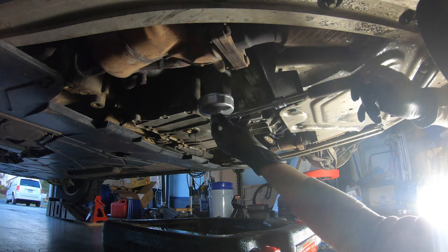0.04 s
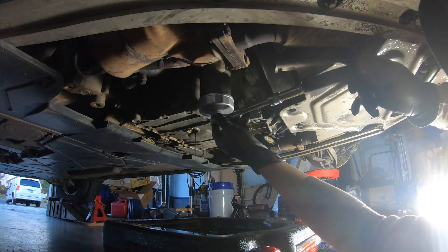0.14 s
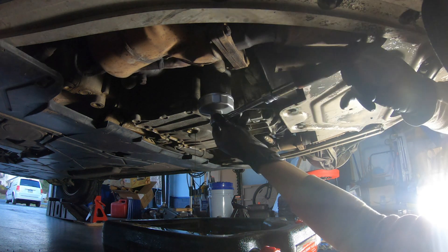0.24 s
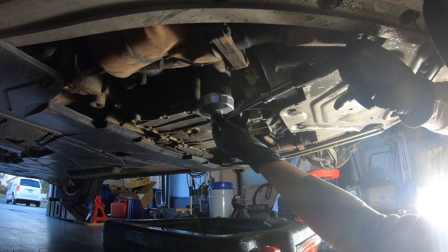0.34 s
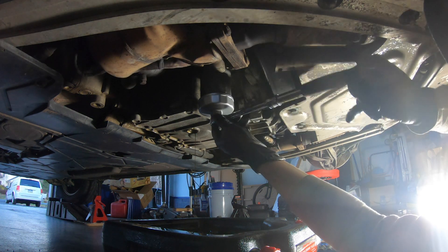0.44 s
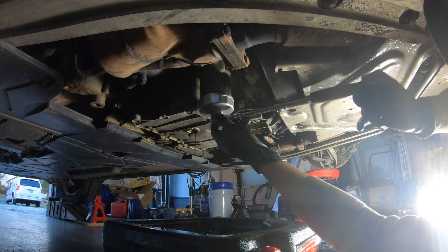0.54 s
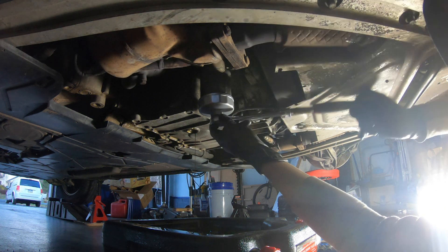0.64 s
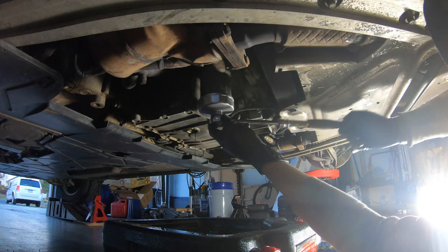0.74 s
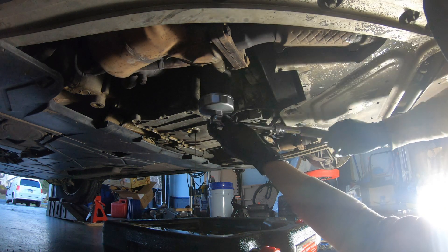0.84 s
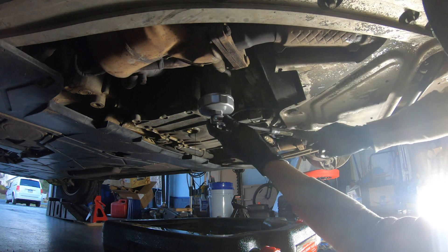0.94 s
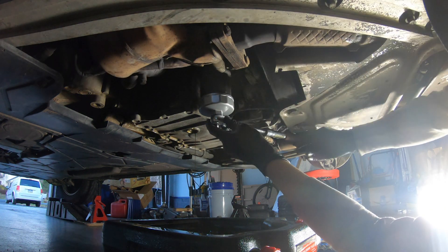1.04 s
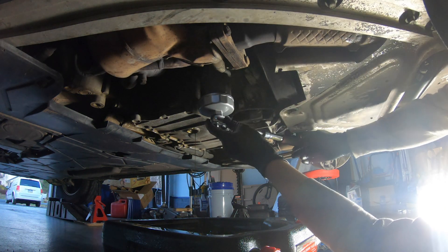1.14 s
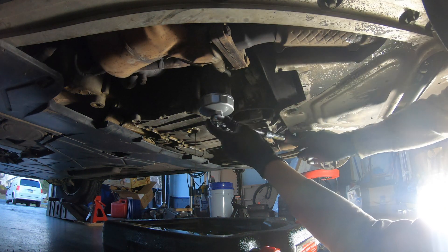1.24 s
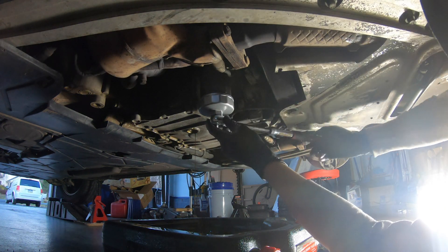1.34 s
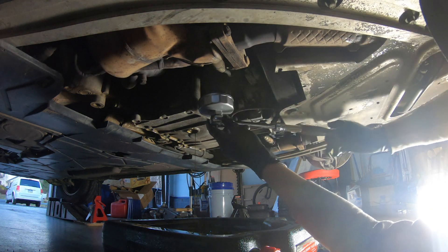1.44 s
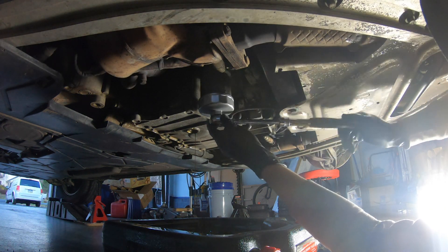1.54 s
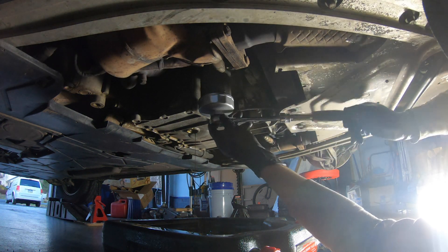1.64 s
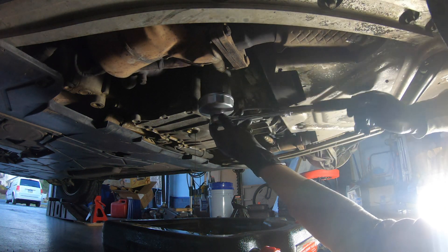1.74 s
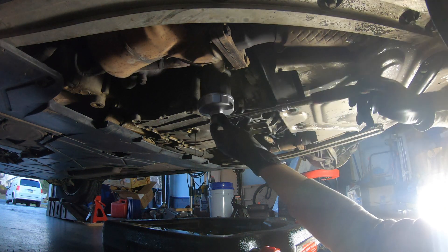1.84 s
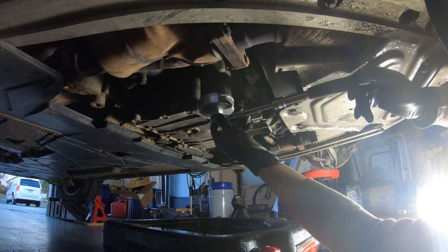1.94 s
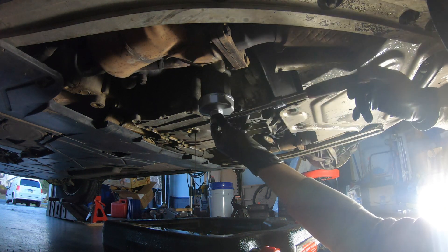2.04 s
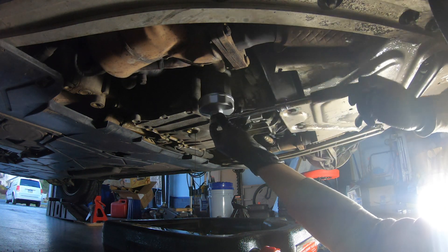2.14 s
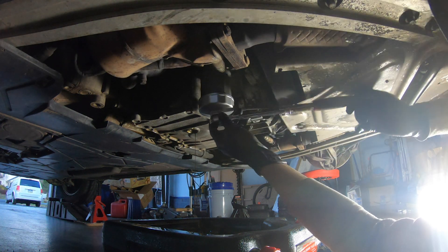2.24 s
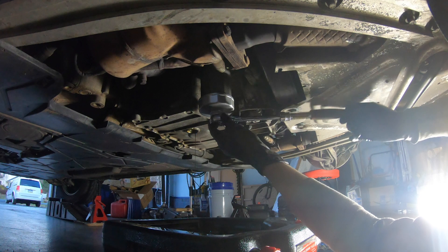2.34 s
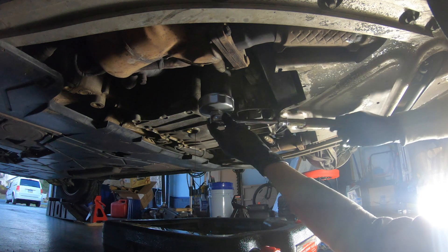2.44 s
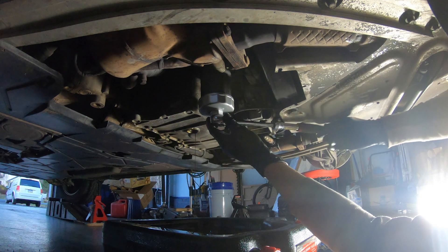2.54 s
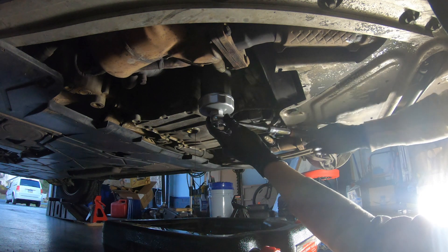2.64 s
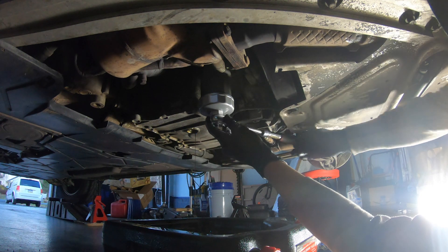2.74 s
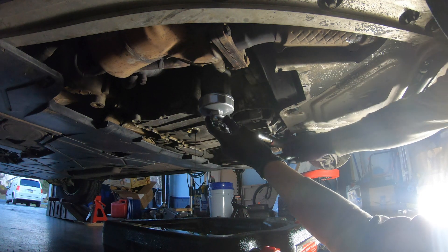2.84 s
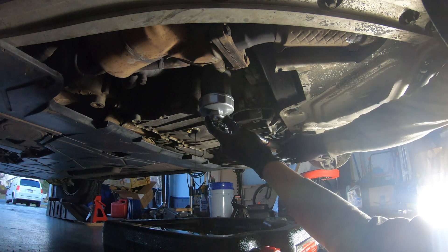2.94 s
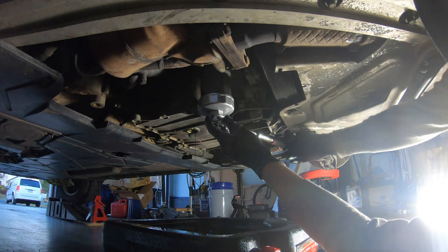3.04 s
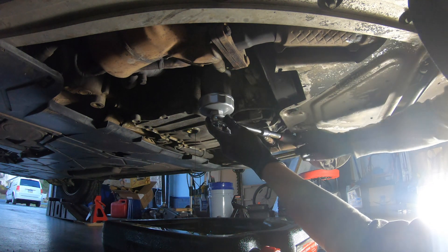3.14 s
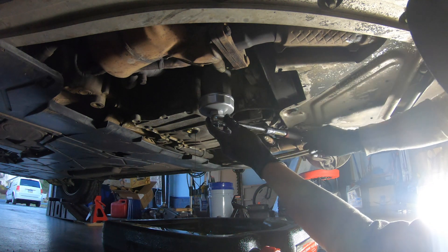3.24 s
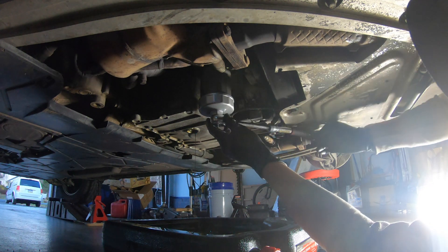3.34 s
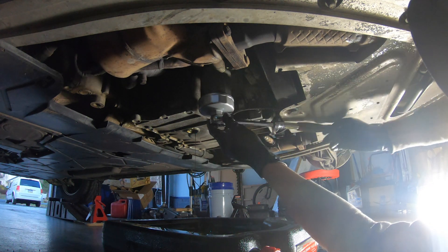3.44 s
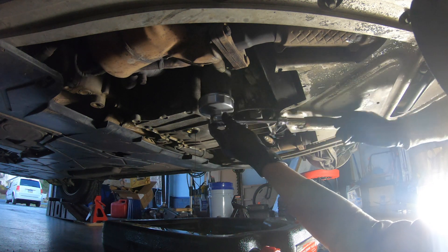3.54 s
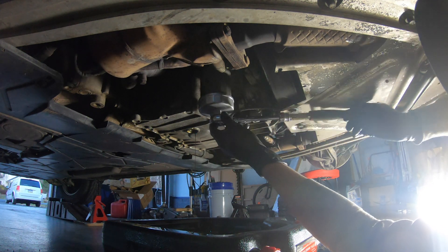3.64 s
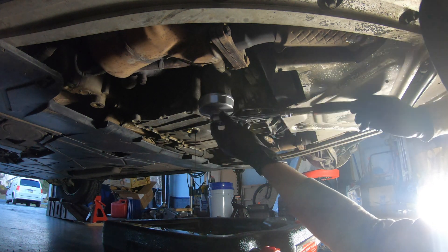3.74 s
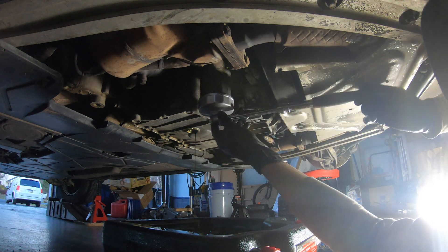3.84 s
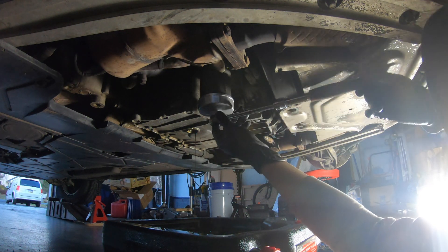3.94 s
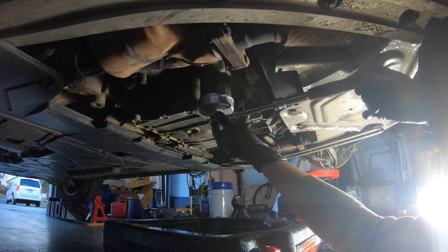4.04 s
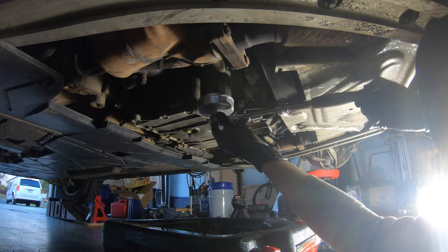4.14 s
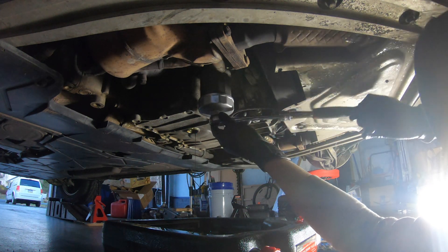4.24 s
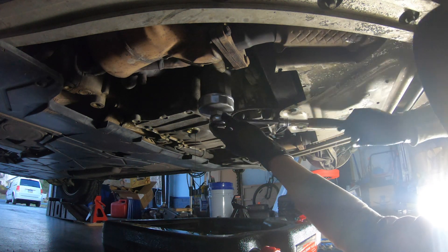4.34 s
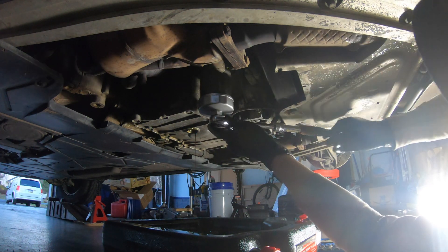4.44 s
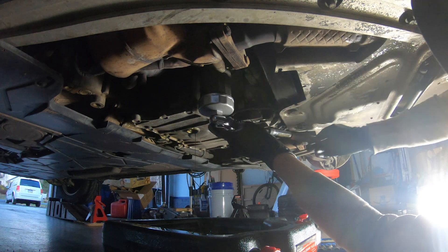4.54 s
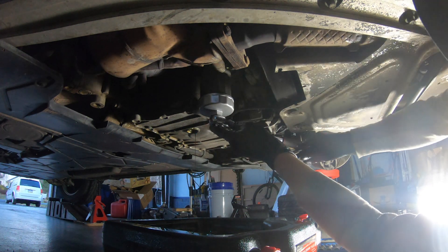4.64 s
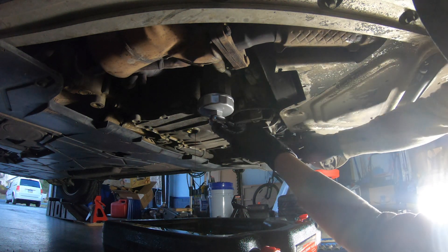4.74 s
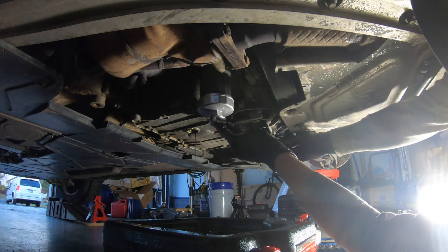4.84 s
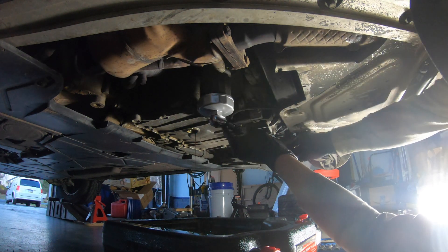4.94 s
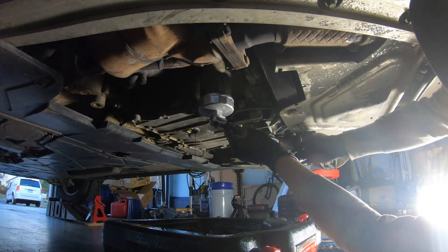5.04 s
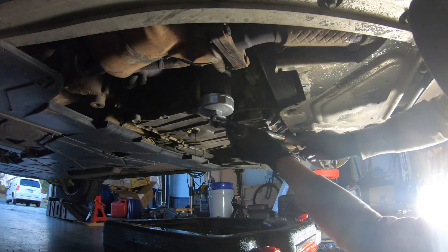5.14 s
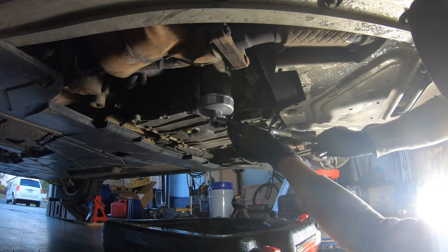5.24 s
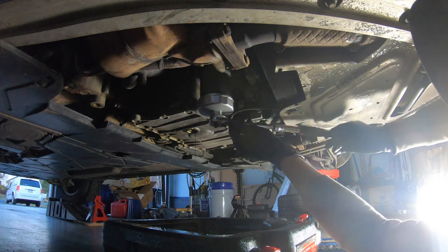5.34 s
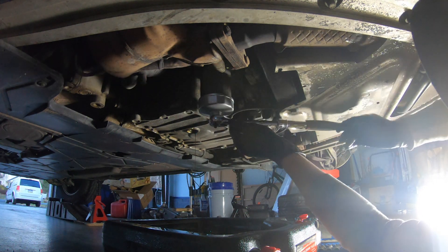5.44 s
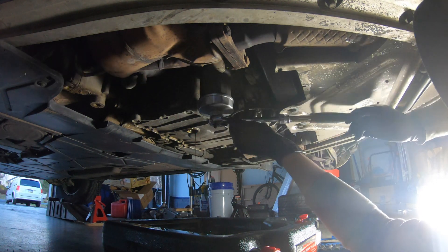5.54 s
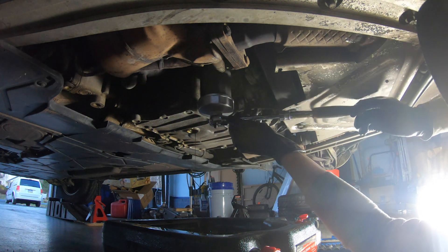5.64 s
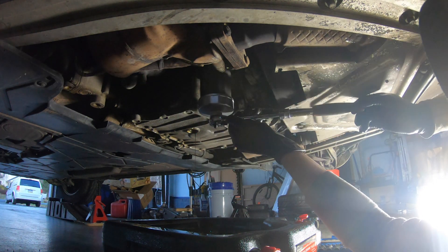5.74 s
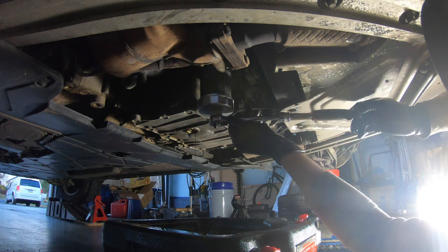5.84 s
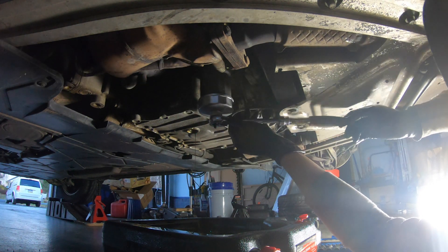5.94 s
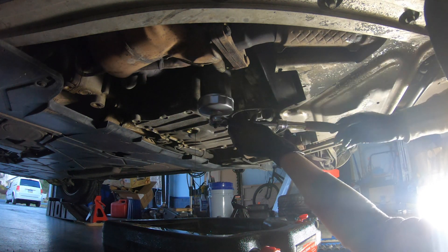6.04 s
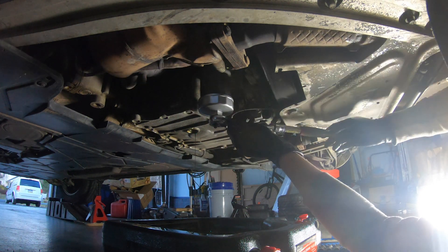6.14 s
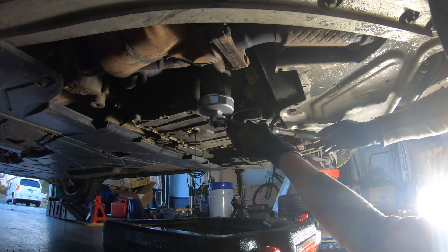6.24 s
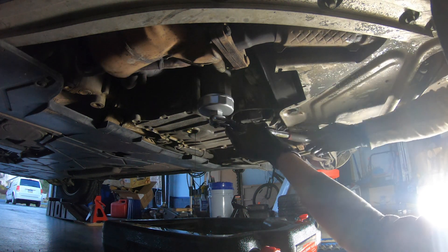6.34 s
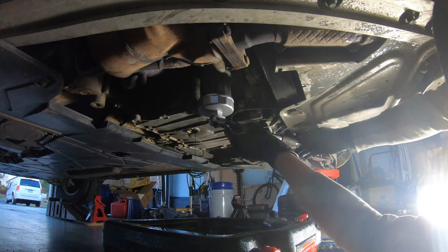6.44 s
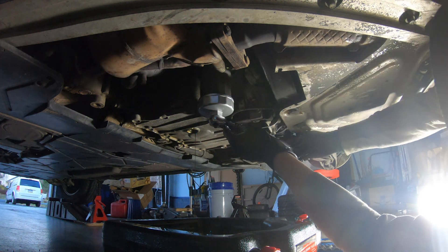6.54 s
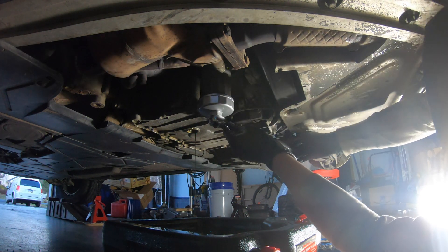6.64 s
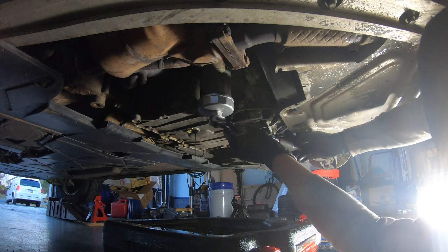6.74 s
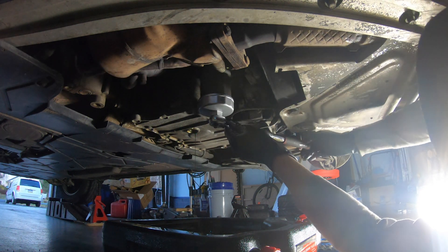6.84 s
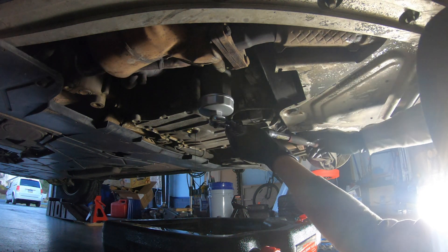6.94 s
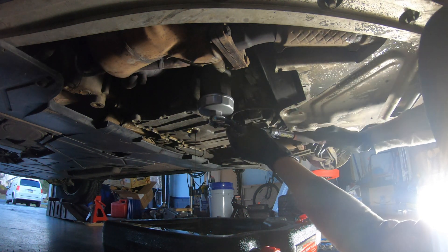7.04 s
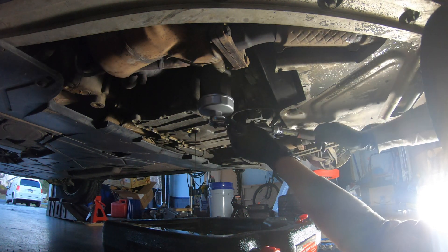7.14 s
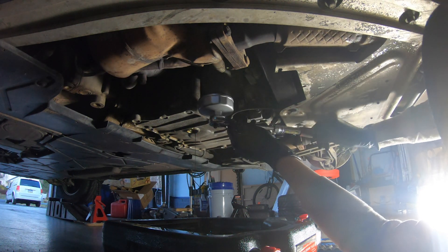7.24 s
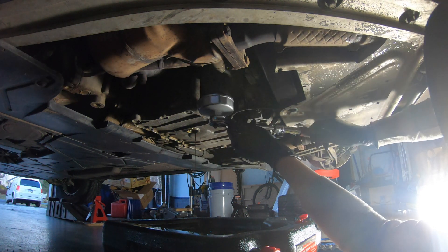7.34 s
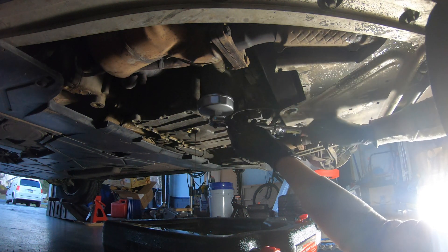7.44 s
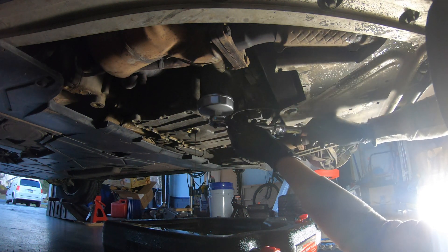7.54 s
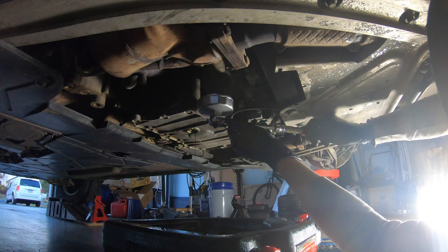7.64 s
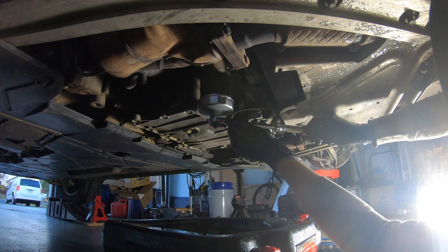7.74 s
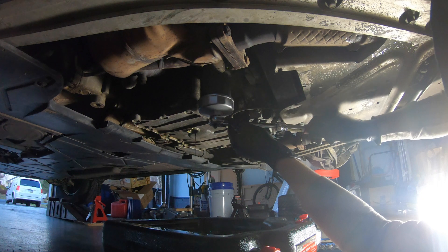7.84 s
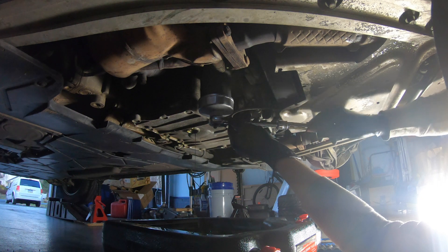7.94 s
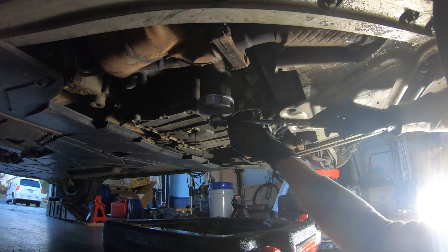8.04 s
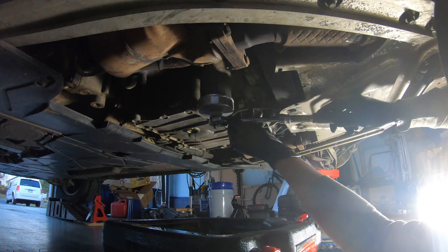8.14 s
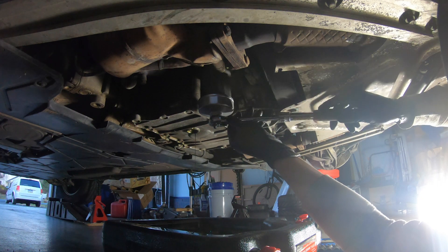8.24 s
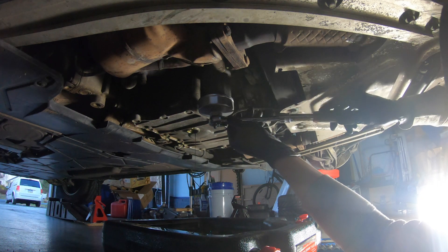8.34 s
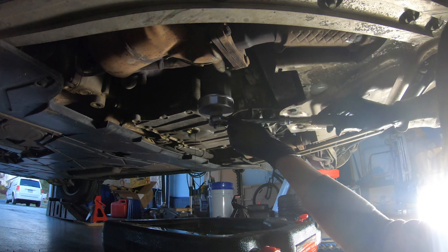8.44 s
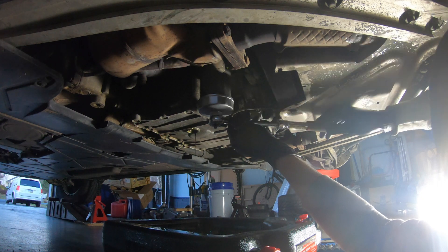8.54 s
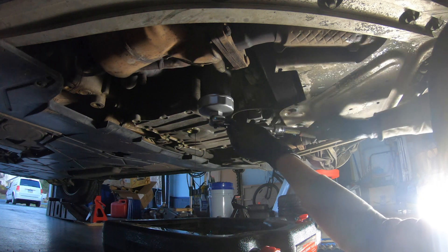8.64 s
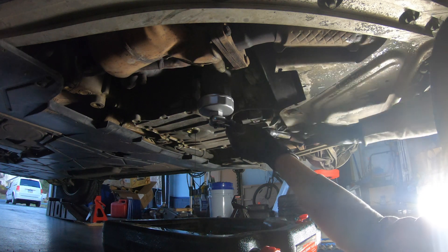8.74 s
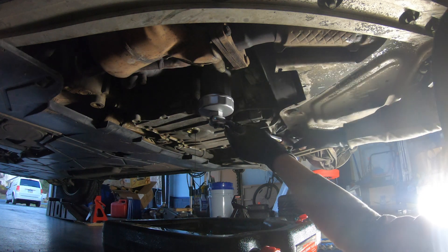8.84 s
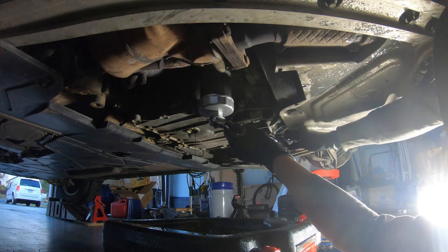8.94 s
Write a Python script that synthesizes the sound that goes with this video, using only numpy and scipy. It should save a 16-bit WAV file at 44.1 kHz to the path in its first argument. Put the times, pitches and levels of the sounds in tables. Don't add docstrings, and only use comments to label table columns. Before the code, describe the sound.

Under a vehicle in a garage, close to small stereo microphones, a faint low hum and glove brush open the scene. At 0.3 s a socket skids with a short metallic stutter and a low panel boom. From 0.6 to 1.1 s a ratchet clicks quickly, bright and hard, with a soft low thump near 1.2. At 1.6 s the handle knocks a panel, ringing low, amid cloth rubbing. Slower clicks run from 2.2 to 3.2 s, spreading apart. Fabric rustles and the housing grinds roughly around 3.8-4.0. A lighter burst clicks from 4.3 to 4.9, then loose taps near 5.7 and 5.9. Another burst spans 6.05-6.7, followed by sleeve swishes and tiny ticks from 7 to 8.3. A final strong, crisp burst runs 8.55-8.95. Each click scatters briefly off the underbody, leaving a faint garage echo.

```python
import sys
import numpy as np
from scipy import signal
from scipy.fft import rfft, irfft
from scipy.io import wavfile
from scipy.ndimage import uniform_filter1d

SR = 44100
rng = np.random.default_rng(int(sys.argv[2]) if len(sys.argv) > 2 else 0)


def ratio_of_db(decibels):
    return 10 ** (np.asarray(decibels, float) / 20)


def transcribe(signal):
    frames = np.atleast_2d(signal).T
    limited = np.clip(frames, -1, 1)
    pcm = np.round(limited * 32767).astype(np.int16)
    wavfile.write(sys.argv[1], SR, pcm)


N = 397341


def evened(x):
    return x / np.sqrt(np.mean(x ** 2) + 1e-20)


def read(points, hz):
    f, value = np.transpose(points)
    return np.interp(np.log(hz + 1), np.log(f + 1), value)


def level_curve(rows):
    start_s, level_db = np.transpose(rows)
    return np.interp(np.arange(N) / SR, start_s, level_db)


def hump(top_s, rise_s, fall_s, db):
    t = np.arange(N) / SR - top_s
    return ratio_of_db(db - 20 * np.maximum(-t / rise_s, t / fall_s))


def add(mix, s, sound):
    part = mix[:, round(s * SR):][:, :sound.shape[1]]
    part += sound[:, :part.shape[1]]


def resonate(x, hz, width):
    return signal.lfilter(*signal.iirpeak(hz, hz / width, SR), x)


def body_mode(x, hz, width, wider):
    return evened(resonate(resonate(x, hz, width), hz, wider * width))


def shared_noise(length, apart):
    noise = rng.standard_normal((3, length))
    return noise[0] + apart * noise[1:]


def stick_slips(length, per_s, apart):
    jolts = (rng.random((2, length)) < per_s / SR) * rng.standard_normal((2, length))
    return jolts[0] + apart * jolts[1] * np.array([[1], [-1]])


def hiss(spectrum, patchy_db, likeness):
    frames, hz = N // 256 + 5, np.fft.rfftfreq(1024, 1 / SR)
    a, b, c, d, patches = rng.standard_normal((frames, 513, 5)).T
    patches = uniform_filter1d(patches, size=10, axis=0)
    patches = evened(uniform_filter1d(patches, size=8, axis=1))
    same = np.clip(read(likeness, hz), -1, 1)[:, None]
    left = a + 1j * b
    right = same * left + np.sqrt(1 - same ** 2) * (c + 1j * d)
    z = np.array([left, right]) * ratio_of_db(read(spectrum, hz)[:, None] + patchy_db * patches)
    return evened(signal.istft(z, nperseg=1024, noverlap=768)[1][:, :N])


def hum():
    # pitch_hz, level_db per Hz
    far_noise = [(20, -15.5), (65, -1.5), (100, -22.5), (250, -1), (440, -8.5), (600, -11), (750, 2),
                 (930, -7.5), (1210, -8), (1860, -12), (2370, -32), (4200, -35), (6720, -32), (10000, -42),
                 (15000, -60)]
    # pitch_hz, likeness
    far_likeness = [(60, 0.94), (240, 0.26), (950, 0.13), (3770, 0.35), (15000, 0.17)]
    # pitch_hz, width_hz, level_db
    air_modes = [(160.6, 16.5, -8), (183.4, 53, -1.5), (228.2, 56.7, 3.5), (305.9, 21.6, -5)]
    # start_s, level_db
    swell = [(0.0, -57), (0.05, -53), (0.1, -63), (0.3, -58.5), (0.37, -50), (0.53, -58), (0.6, -50.5),
             (0.72, -49), (0.77, -57.5), (1.38, -55), (1.55, -62), (1.6, -52.5), (1.68, -61), (2.86, -64),
             (2.88, -60), (7.73, -62), (8.96, -59), (9.01, -59)]
    noise = ratio_of_db(-63) * hiss(far_noise, patchy_db=2.5, likeness=far_likeness)
    air = shared_noise(N, apart=0.23)
    drone = sum(ratio_of_db(db) * body_mode(air, hz, width, 1.46) for hz, width, db in air_modes)
    drone = signal.sosfilt(signal.butter(4, 125, "high", fs=SR, output="sos"), drone)
    return noise + evened(drone) * ratio_of_db(level_curve(swell) - 1.1)


def rubbing():
    # top_s, rise_s, fall_s, level_db, rustle_over_swish_db
    stroke_rows = [(.056, 0.074, 0.085, -71.5, 8.5), (.864, 1.7, 1.4, -75, -6),
                   (1.57, 0.038, 0.04, -61, -1), (1.905, 0.021, 0.087, -56, 8),
                   (2.9, 1.07, 1.2, -70.5, -11), (3.149, 0.92, 0.087, -62.5, -2),
                   (3.701, 0.006, 0.64, -65, 5.5), (3.9, 0.084, 0.095, -54, -1.5),
                   (4.009, 0.79, 0.022, -58, -2), (4.55, 0.52, 0.73, -63.5, -11),
                   (5.031, 0.048, 0.038, -66, 7), (5.598, 0.9, 0.82, -74, 1), (7.52, 0.26, 0.16, -73, 0.5),
                   (6.495, 0.1, 0.15, -54.5, 5), (6.56, .03, 2.3, -76, 1.5), (7.243, 0.064, 0.2, -72, 5.5),
                   (7.35, 0.083, 0.15, -60.5, -13), (7.68, 0.085, 0.07, -57, -15.5),
                   (7.976, 0.032, 0.025, -63, -12.5), (8.11, 0.13, 0.24, -61, -6),
                   (8.26, 0.33, 0.067, -67.5, -2), (8.524, 0.095, 1.5, -53.5, -2.5),
                   (8.74, 0.13, 0.23, -79, -13), (8.99, 0.098, 0.12, -54.5, -1), (.22, .3, 0.29, -83.5, 2),
                   (1.4, .4, 0.34, -85, -1), (3.45, .3, 0.24, -93, -3), (7.048, .5, 0.32, -86.5, 0.5)]
    # pitch_hz, level_db per Hz
    fine_cloth = [(2000, -21.5), (3400, -1.5), (4750, -6.5), (5730, -4.5), (7340, -7.5), (11600, -27.5),
                  (13400, -31.5), (15500, -43)]
    # pitch_hz, level_db per Hz
    mid_cloth = [(1060, -19.5), (1800, -5.5), (1920, 3.5), (2380, -2.5), (2570, -2), (3800, -10.5),
                 (4940, -55.5), (8360, -120)]
    # pitch_hz, level_db per Hz
    heavy_cloth = [(450, -15.5), (700, -3.5), (930, -7), (1200, 0.5), (1800, -4), (2300, -40), (4000, -80)]
    # fine_db, swish_db, coarse_db
    resting = (-94.5, -92.5, -72.5)
    strokes = np.array([hump(*row[:4]) for row in stroke_rows])
    effort = strokes.sum(0)
    rustle = ratio_of_db(np.array(stroke_rows)[:, 4]) @ strokes
    scrape = ratio_of_db(-3) * np.sqrt(effort * rustle)
    grain = ratio_of_db(1.5 * evened(uniform_filter1d(rng.standard_normal(N), size=150)))
    fine = hiss(fine_cloth, patchy_db=2.5, likeness=[(1500, 0.87), (10000, 0.06)])
    swish = hiss(mid_cloth, patchy_db=3.0, likeness=[(1500, 0.093), (4000, 0.88)])
    coarse = hiss(heavy_cloth, patchy_db=2.5, likeness=[(400, 0.22), (2000, 0.15)])
    cloth = fine * (rustle + ratio_of_db(resting[0]))
    cloth += swish * (effort + ratio_of_db(resting[1]))
    cloth += coarse * (scrape + ratio_of_db(resting[2]))
    return cloth * evened(grain)


def thumps():
    # start_s, level_db
    pushes = [
        (.16, -65),
        (1.21, -58.5),
        (8.45, -67),
    ]
    floor_hz, push_s = 67.6, 0.043
    t = np.arange(N) / SR
    rumble = resonate(rng.standard_normal(N), floor_hz, 30)
    rumble = evened(resonate(rumble, floor_hz, 40))
    return rumble * sum(ratio_of_db(db) * np.exp(-((t - s) / push_s) ** 2 * 2) for s, db in pushes)


def slip():
    # start_s, level_db
    skid = [
        (.312, -55),
        (.318, -37),
        (.326, -31),
        (.365, -32),
        (.39, -38.5),
        (.42, -52),
        (.46, -48),
        (.485, -54),
        (.51, -65),
    ]
    # pitch_hz, width_hz, level_db
    skid_modes = [(700, 250, -7.5), (975, 53, 0), (1105, 58, 4), (1280, 80, 7), (1750, 55, 0),
                  (2000, 70, -0.5), (2300, 90, -0.5), (2750, 60, 0.5), (3220, 110, 0), (3800, 210, -1),
                  (4340, 100, -1), (4690, 82, -4), (6050, 200, -8), (7500, 1200, -10)]
    lag_s, hold_s = 0.014, 0.024
    sag_per_s = .25
    jolts = stick_slips(9000, 5000, apart=0.57)
    t, chatter = np.arange(9000) / SR, 0
    for hz, width, db in skid_modes:
        octaves = max(np.log2(4700 / hz), 0)
        late = np.abs(t - .006 - lag_s * octaves) / (.012 + hold_s * octaves)
        chatter = chatter + ratio_of_db(db - 11 * np.tanh(late / 1.6)) * body_mode(jolts, hz, width, 3)
    chatter = np.array([np.interp(t * (1 - sag_per_s * t), t, side) for side in chatter])
    boom = evened(resonate(resonate(jolts.mean(0), 325, 45), 344, 170))
    scraped, boomed = np.zeros((2, 2, N))
    add(scraped, skid[0][0], chatter / np.std(chatter[:, 400:2600]))
    add(boomed, skid[0][0], np.tile(boom, (2, 1)))
    panel_gain = hump(top_s=.378, rise_s=.05, fall_s=.06, db=-42)
    return scraped * ratio_of_db(level_curve(skid)) + boomed * panel_gain


def crack():
    rise_s = 0.00039
    t = np.arange(300) / SR
    burst = rng.standard_normal(300) * t / rise_s * np.exp(-t / rise_s)
    burst = resonate(resonate(burst, 4600, 4500), 5200, 6000)
    burst = signal.sosfilt(signal.butter(4, 8500, fs=SR, output="sos"), burst)
    return np.tile(burst / np.std(burst[:220]), (2, 1))


def ring(modes, lean_db, spread_db, apart, snap_db, scatter_db, scatter_t60):
    t = np.arange(1150) / SR
    hz, db, t60 = np.transpose(modes + modes)[:, :, None]
    strength, shift, phase, turn = rng.standard_normal((4, len(hz), 1))
    angle = 2 * np.pi * hz * (1 + 0.02 * shift) * t + 1.26 * phase
    snap = ratio_of_db(snap_db - 60 * t / (0.16 * t60))
    decay = ratio_of_db(lean_db(hz) - 60 * t / t60) + snap
    size = ratio_of_db(db + spread_db * strength) * decay * (1 - np.exp(-t * hz / 2.36))
    direct = np.array([(size * np.sin(angle + side * apart * turn)).sum(0) for side in (-1, 1)])
    direct = direct * np.cos(np.pi / 2 * t / t[-1])
    direct = np.pad(direct, ((0, 0), (0, 4096 - len(t))))

    t, f = np.arange(4096) / SR, np.fft.rfftfreq(4096, 1 / SR)
    peaks = ratio_of_db(2 * db + lean_db(hz)) / (1 + ((f / hz - 1) / 0.12) ** 4)
    colour = np.sqrt(peaks.sum(0))
    panels = shared_noise(4096, apart=0.9)
    tail = evened(irfft(rfft(panels) * colour))
    tail = tail * ratio_of_db(-60 * t / scatter_t60) * np.minimum(t / 0.0029, 1)
    sound = direct / np.std(direct[:, :220]) + ratio_of_db(scatter_db) * tail
    return sound / np.sqrt(np.mean(sound.mean(0)[:220] ** 2))


def ratchet():
    # pitch_hz, level_db, t60_s
    handle_modes = [(2190, -6, 0.014), (2355, -12.5, 0.034), (2680, -3.5, 0.018), (3150, -4, 0.017),
                    (3430, -6.5, 0.027), (3744, -8.5, 0.018), (4190, -11.5, 0.034), (4640, -9, 0.015)]
    # pitch_hz, level_db, t60_s
    socket_modes = [(806.4, -4, 0.12), (850.5, 2.5, 0.068), (1085, 1, 0.072), (1338, -6, 0.15),
                    (1393, -1, 0.063), (1661, 0, 0.049)]
    # pitch_hz, level_db, t60_s
    head_modes = [(5600, -8, 0.024), (5513, 0, 0.0326), (6140, -6.5, 0.034), (6514, 3.5, 0.028),
                  (7077, 0.5, 0.034), (7570, -5, 0.04), (8780, -9.5, 0.051), (9090, -8, 0.025),
                  (10780, -19.5, 0.029), (12200, -19.5, 0.0256), (13240, -26, 0.025), (14500, -46.5, .015)]
    # start_s, strength_db, head_over_handle_db, socket_over_handle_db, grip_hz
    swing_1 = [(0.6132, -26, -4.5, -20.5, 3400), (0.6479, -26.5, -2.5, -14.5, 3780),
               (0.6785, -23.5, -4, -18, 3740), (0.7056, -22, -9, -15, 3420),
               (0.732, -24.5, -4.5, -16, 3220), (0.757, -26, -5.5, -14.5, 3180),
               (0.7836, -29, -9, -9, 3460), (0.815, -25, -10, -9.5, 2680), (0.8492, -26, -6, -11.5, 2680),
               (0.897, -25.5, -8, -11.5, 2900), (0.9422, -28, -6.5, -5, 2520),
               (0.979, -26.5, -7, -14, 2680), (1.0345, -27.5, -5.5, -11.5, 3740),
               (1.0697, -30, -5.5, -16.5, 3340), (1.134, -29, -8.5, -19.5, 3700)]
    swing_2 = [(2.1593, -33.5, -11, -14, 3150), (2.1659, -29, -13, -9, 3620),
               (2.2996, -24.5, -8, -18.5, 2680), (2.375, -23.5, -8.5, -25, 3150), (2.46, -29, -3, -8, 2830),
               (2.4787, -30, -5.5, -7.5, 2400), (2.5482, -25, -13.5, -13, 2680),
               (2.6383, -26, -6, -14.5, 3220), (2.7369, -27.5, -9, -13.5, 2720),
               (2.8416, -27.5, -5, -15.5, 2840), (2.9618, -24.5, -8, -18, 2680),
               (3.1889, -26.5, -11, -16.5, 2980)]
    swing_3 = [(4.2899, -31.5, -4.5, -8, 3150), (4.3255, -30.5, -4.5, -15.5, 3800),
               (4.3561, -35.5, 0.5, -12, 3840), (4.4, -34.5, -4.5, -11.5, 3630),
               (4.4361, -38.5, 0.5, -6, 2070), (4.4719, -35, 0, -9.5, 2630), (4.513, -33, 0, -10.5, 2360),
               (4.5559, -28, -6.5, -22, 2350), (4.5954, -28, -7.5, -18, 2310),
               (4.637, -31.5, -1, -15.5, 2630), (4.6869, -26.5, -5, -12.5, 3430),
               (4.7375, -28, -4.5, -13, 2480), (4.8114, -30, -9, -11, 2680),
               (4.9121, -41.5, -3.5, -8.5, 3360)]
    swing_4 = [(6.0541, -31, -13.5, -7, 3220), (6.1106, -32.5, -5, -7.5, 2900),
               (6.169, -24.5, -4.5, -18, 3560), (6.2215, -31.5, -7, -5, 3140),
               (6.2943, -32, -8.5, -7, 3350), (6.3734, -29, -4.5, -9, 3750), (6.418, -29, -8, -10, 3360),
               (6.502, -22, -11.5, -13.5, 3440), (6.544, -25, -10, -11, 3500),
               (6.6619, -29, -9.5, -6, 2440)]
    swing_5 = [(8.5616, -23.5, -10.5, -10, 3300), (8.5997, -28.5, -10.5, -7, 3450),
               (8.6552, -21.5, -7.5, -14.5, 3300), (8.69, -23.5, -10.5, -12, 3150),
               (8.745, -24, -8.5, -10, 3420), (8.778, -23, -11, -13.5, 3260),
               (8.829, -24.5, -8, -11.5, 3320), (8.882, -26, -10, -9.5, 2650),
               (8.937, -28.5, -6, -9.5, 3450)]
    # start_s, handle_db, socket_db, head_db,
    # grip_hz
    loose_taps = [(.471, -29.5, -48, -51, 3570), (1.279, -32.5, -39.5, -48, 3100),
                  (1.451, -58, -101, -98, 3056), (1.494, -55, -58, -87, 3270),
                  (1.5347, -51, -48.5, -79, 3340), (1.5817, -35, -44, -52, 3230),
                  (1.5957, -21, -35, -32, 3150), (4.116, -67, -49.5, -82, 1900),
                  (4.185, -49.5, -83, -74, 1760), (5.119, -45, -45.5, -58, 3500),
                  (5.6821, -29.5, -42.5, -49, 3400), (5.9123, -37.5, -48.5, -59, 3030),
                  (5.925, -45.5, -48.5, -66.5, 2940), (0.486, -51, -45, -66, 2390),
                  (2.651, -34, -55, -46, 3200), (2.855, -36, -48, -62, 2700),
                  (6.8553, -42.5, -52, -55, 3470), (6.9588, -55, -70, -69, 1830),
                  (7.6405, -51, -54, -71, 2100), (7.7012, -46.5, -51, -66, 2340),
                  (1.02, -43, -55, -56, 3000), (8.265, -58, -48.5, -64, 2300),
                  (3.6964, -60, -66, -57, 3500),
        (5.0893, -55, -53, -71, 3100),
        (5.016, -55.5, -57, -65, 3000),
        (7.6604, -51, -56, -76, 2530),
        (7.6681, -50, -57, -72.5, 2300),
        (7.931, -64.5, -76, -78, 4200),
        (7.9584, -67, -59, -70, 3000),
        (8.0791, -56, -66, -67, 2410),
        (8.0974, -58, -64, -70, 2310),
    ]
    # head_hz, top_edge_db
    brightness = [
        (7200, 9),
        (6600, -4.5),
        (6650, 5.5),
        (7150, -5),
        (7250, 11),
        (6800, -16),
    ]
    blows = [(*row, *brightness[-1]) for row in loose_taps]
    for swing, crisp in zip((swing_1, swing_2, swing_3, swing_4, swing_5), brightness):
        for s, db, bright_db, low_db, grip_hz in swing:
            blows.append((s, db - 0.5, db + 1 + low_db, db - 0.6 + bright_db, grip_hz, *crisp))

    out = np.zeros((2, N))
    for s, handle_db, socket_db, head_db, grip_hz, head_hz, top_db in blows:
        grip = lambda hz: 10.8 * np.exp(-(np.log(hz / grip_hz) / 0.15) ** 2)
        shine = lambda hz: 5.0 * np.exp(-(np.log(hz / head_hz) / 0.063) ** 2)
        head = [(hz, db + top_db * np.clip(np.log2(hz / 8000), 0, 1), t60) for hz, db, t60 in head_modes]
        sound = ratio_of_db(handle_db - 9.5) * ring(handle_modes, grip, spread_db=-1.0, apart=0.32, snap_db=14,
                                            scatter_db=-3.0, scatter_t60=0.068)
        sound += ratio_of_db(socket_db - 5.5) * ring(socket_modes, np.zeros_like, spread_db=-0.5, apart=0.3, snap_db=5.5,
                                             scatter_db=-1.0, scatter_t60=0.11)
        sound += ratio_of_db(head_db - 3.5) * ring(head, shine, spread_db=2.0, apart=0.93, snap_db=14,
                                           scatter_db=-4.0, scatter_t60=0.062)
        crack_db = -5.5 + 0.31 * (handle_db - 11.5) + 0.71 * head_db
        add(sound, .0004, ratio_of_db(crack_db) * crack())
        pan_db = -1.1 + 0.5 * rng.standard_normal()
        add(out, s + .0002, sound * ratio_of_db(np.array([[.5], [-.5]]) * pan_db))
    return out


def knock():
    # pitch_hz, level_db, t60_s
    panel_modes = [(292, 8, 0.2), (416, 1.5, 0.83), (713, 12, 0.18), (990, 1, 0.31)]
    # pitch_hz, level_db, t60_s
    bar_modes = [(860, -3, 0.08), (1140, -5.5, .07), (1620, -4, 0.0597), (2780, -9.5, .05), (2940, 2, .05),
                 (3200, -1.5, 0.099), (4134, -8, .05), (4900, -14, .05), (6160, -5, .03), (6490, -8.5, .04),
                 (7100, -12, 0.041), (7445, -8.5, .05), (8640, -10, 0.055), (9800, -12, .03)]
    # start_s, pitch_hz, level_db, t60_s
    singing = [
        (.732, 7150, -40, 0.2),
        (1.597, 3200, -49.5, 0.5),
        (5.683, 3430, -65, 0.73),
    ]
    knock_s = 1.597
    out, t = np.zeros((2, N)), np.arange(SR // 2) / SR
    panel = sum(ratio_of_db(db - 60 * t / t60) * np.sin(2 * np.pi * hz * t) for hz, db, t60 in panel_modes)
    add(out, knock_s, np.tile(ratio_of_db(-48.5) * panel / np.std(panel[:2000]), (2, 1)))
    bar = ring(bar_modes, np.zeros_like, spread_db=1.5, apart=0.33, snap_db=13, scatter_db=-8, scatter_t60=0.081)
    add(out, knock_s, ratio_of_db(-23) * bar)
    for s, hz, db, t60 in singing:
        tone = evened(resonate(rng.standard_normal((2, len(t))), hz, 45))
        add(out, s, tone * ratio_of_db(db - 60 * t / t60))
    return out


def whisks():
    # top_s, rise_s, fall_s, level_db, pitch_hz, width_hz
    slides = [
        (8.11, 0.11, 0.18, -56.5, 2300, 720),
        (7.33, .06, 0.11, -60, 2100, 510),
        (2.5, .15, 0.088, -65, 1800, 1600),
        (5.245, 0.027, .02, -73, 2200, 130),
    ]
    noise = shared_noise(N, apart=.5)
    return sum(body_mode(noise, hz, width, 2) * hump(s, rise, fall, db)
               for s, rise, fall, db, hz, width in slides)


def grind():
    # start_s, level_db
    force = [
        (3.74, -67),
        (3.86, -45.5),
        (3.93, -43),
        (3.97, -53),
        (4.01, -71),
        (4.06, -57),
    ]
    # pitch_hz, width_hz, level_db
    housing_modes = [(518, 68, -3.5), (640, 88, 2), (956, 110, 0.5)]
    slips = stick_slips(15000, 2500, apart=0.34)
    body = sum(ratio_of_db(db) * body_mode(slips, hz, width, 4) for hz, width, db in housing_modes)
    out = np.zeros((2, N))
    add(out, force[0][0], evened(body) * signal.windows.tukey(15000, .2))
    return out * ratio_of_db(level_curve(force) - 3.5)


def garage(x):
    # pitch_hz, t60_s
    room_decay = [(500, 0.55), (2000, 0.58), (6000, 0.49), (12000, 0.34)]
    taps = np.zeros((2, SR))
    at = np.arange(600, SR - 20, 20)
    at = at + rng.integers(0, 20, (2, len(at)))
    np.put_along_axis(taps, at, rng.choice([-1., 1.], at.shape), 1)
    hz, t, z = signal.stft(taps, SR, nperseg=256)
    decay = ratio_of_db(-60 * t / read(room_decay, hz)[:, None])
    tail = signal.istft(z * decay, SR, nperseg=256)[1]
    return signal.fftconvolve(x.mean(0)[None], tail / np.linalg.norm(tail[0]), axes=1)[:, :N]


def scene():
    around = hum() + rubbing() + thumps() + whisks()
    bump = knock()
    wrench = slip() + ratchet() + bump + grind()
    blur = 0.98
    smear = uniform_filter1d(rng.standard_normal(N), size=40)
    smear = evened(uniform_filter1d(smear, size=40))
    echo = garage((wrench - 0.21 * bump) * (1 - blur + blur * smear))
    echo = echo + ratio_of_db(-9.5) * resonate(echo, 7100, 800)
    return wrench + ratio_of_db(-13.0) * echo + around * ratio_of_db(np.array([[-.6], [.6]]))


def low_pass(x):
    return signal.sosfilt(signal.butter(12, 16500, fs=SR, output="sos"), x)


def record(dry):
    limited = signal.oaconvolve(dry, signal.firwin(255, 16400, fs=SR)[None], "same")
    return low_pass(limited)


dry = scene()
out = record(dry)
transcribe(out)
```